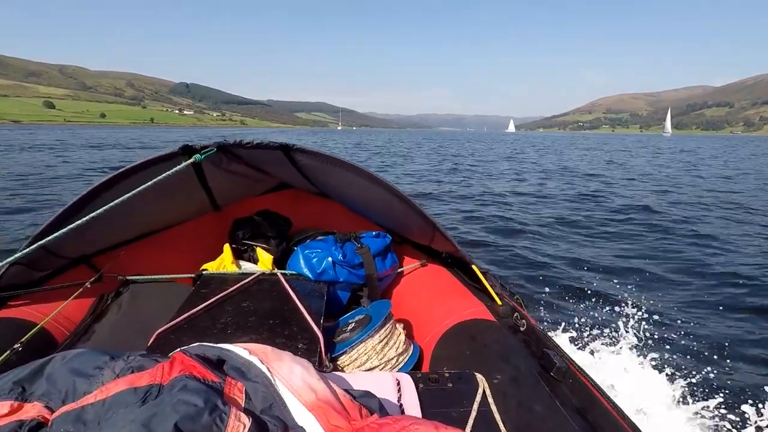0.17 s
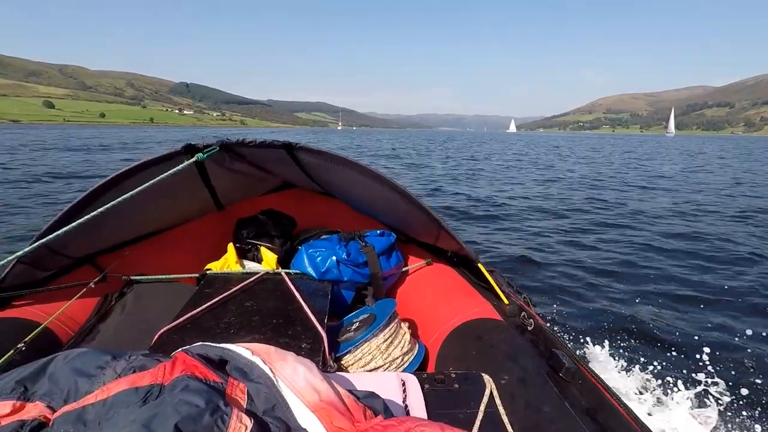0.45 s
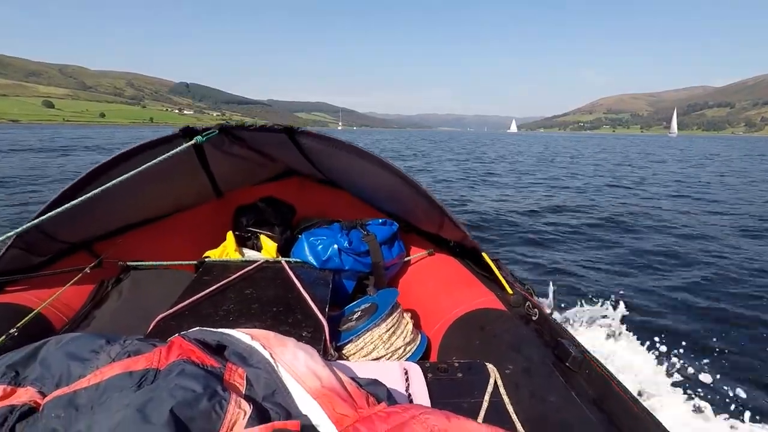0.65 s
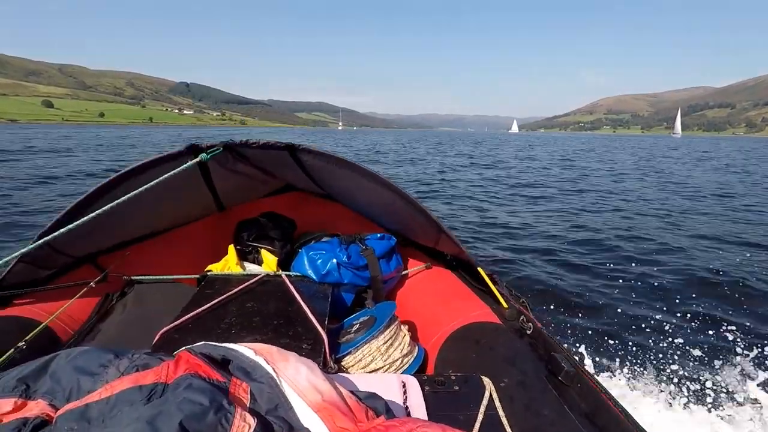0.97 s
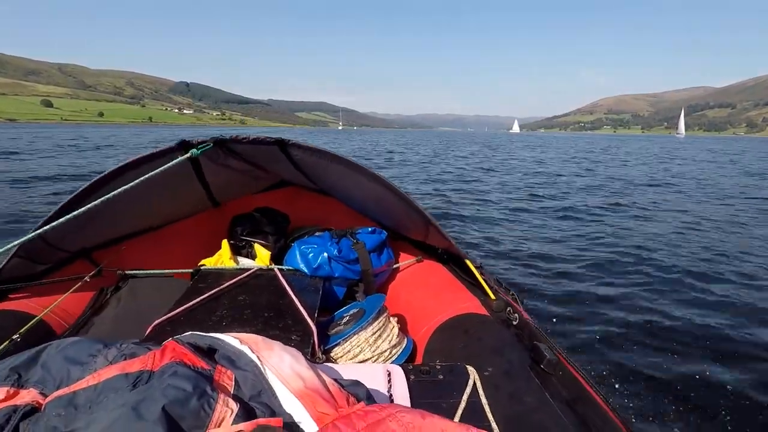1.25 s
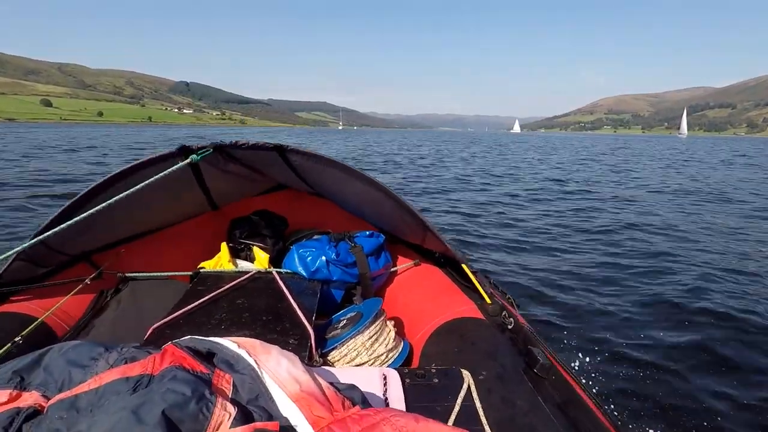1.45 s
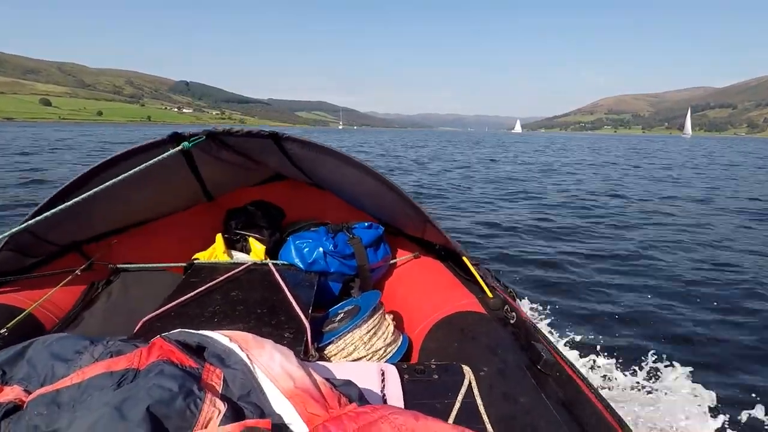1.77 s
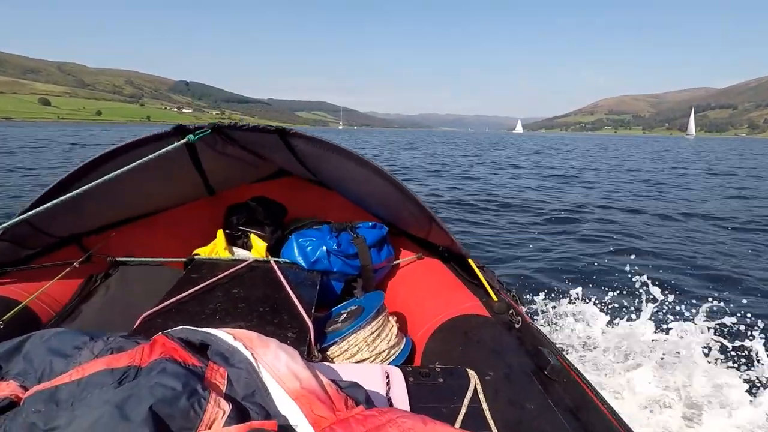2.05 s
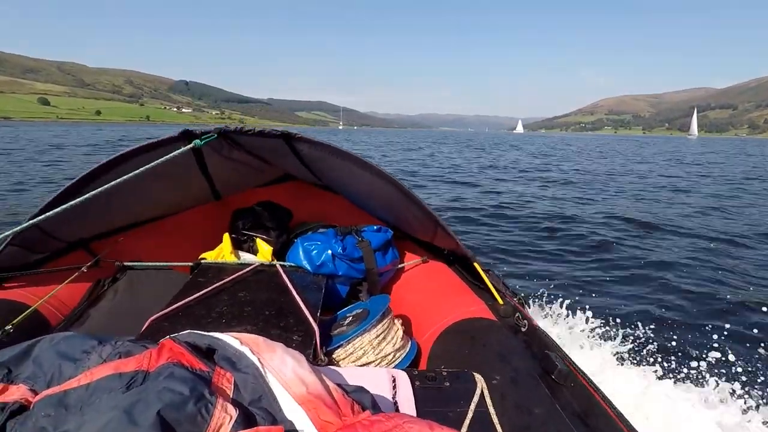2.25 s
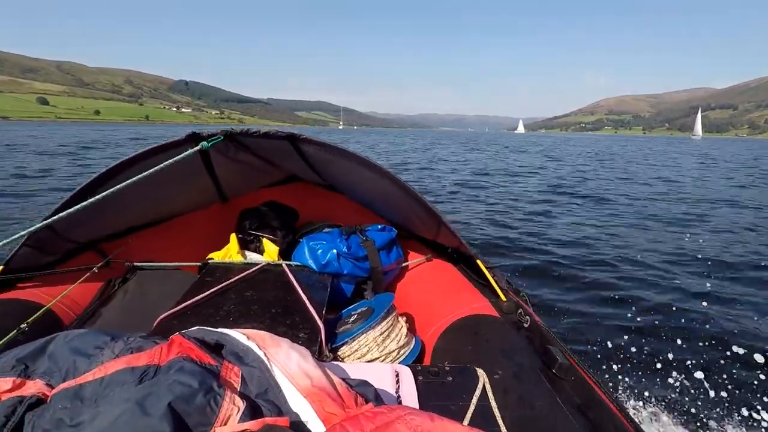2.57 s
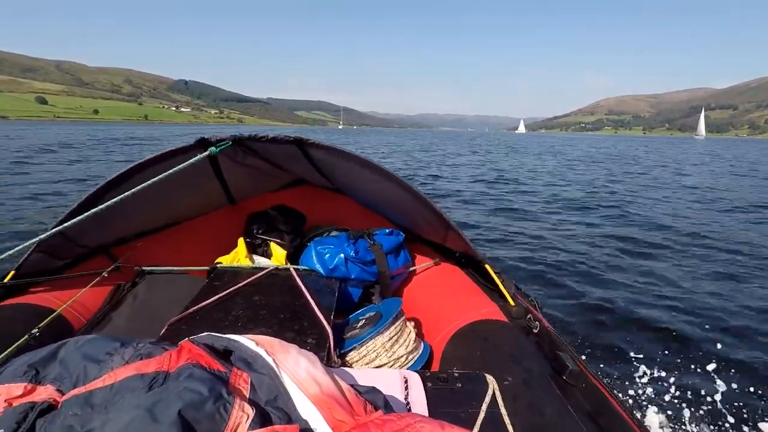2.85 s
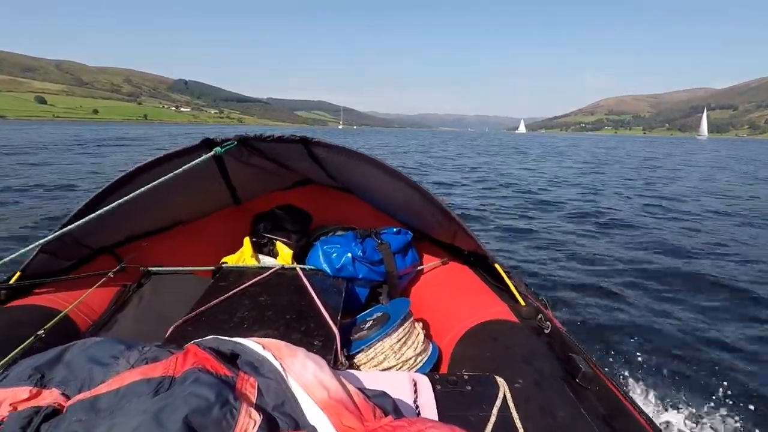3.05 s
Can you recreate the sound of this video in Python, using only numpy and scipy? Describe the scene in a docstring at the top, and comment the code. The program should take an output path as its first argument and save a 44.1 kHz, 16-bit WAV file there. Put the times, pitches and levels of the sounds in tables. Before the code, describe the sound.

Steady low outboard engine hum on an inflatable boat, with gusty wind rumble and splashing spray.

```python
"""A small outboard motor pushes an inflatable boat over open water at a steady throttle.
Sines locked to the shaft make its exhaust drone and gear whine; pulsing noise makes the cowl rattle.
Low noise in quick gusts is the wind on the microphone; droplets and foam hiss make the wash
along the hull and the spray that the bow throws at each wave. A limiter holds the peaks."""
import sys
import numpy as np
from scipy import signal
from scipy.fft import rfft, irfft, next_fast_len
from scipy.io import wavfile
from scipy.ndimage import uniform_filter1d, minimum_filter1d, map_coordinates

SR = 44100
rng = np.random.default_rng(int(sys.argv[2]) if len(sys.argv) > 2 else 0)


def transcribe(signal):
    """Save signal, clipped to [-1, 1], as a 16-bit WAV file at the path in sys.argv[1]."""
    frames = np.atleast_2d(signal).T
    limited = np.clip(frames, -1, 1)
    pcm = np.round(limited * 32767).astype(np.int16)
    wavfile.write(sys.argv[1], SR, pcm)


N = 141120  # samples, 3.2 s
TIME = np.arange(N) / SR  # s


def amp(db):
    """Decibels to gain."""
    return 10 ** (np.asarray(db) / 20)


def unit(x):
    """Scale to rms 1."""
    return x / np.sqrt(np.mean(x ** 2) + 1e-20)


def curve(points):
    """Straight lines through (time [s], value) points."""
    return np.interp(TIME, *np.transpose(points))


def wobble(rate):
    """A smooth random curve around 0, with rate knots a second."""
    return map_coordinates(rng.standard_normal(4096), [TIME * rate + 2], mode="wrap")


def filtered(x, response):
    """Multiply the spectrum of x by a response of frequency [Hz]."""
    padded = next_fast_len(N + SR // 2)
    hz = np.fft.rfftfreq(padded, 1 / SR)
    return irfft(rfft(x, padded) * response(hz), padded)[:N]


def coloured(x, spectrum):
    """Shape x by (frequency [Hz], level [dB]) points on a log axis, at rms 1."""
    points_hz, points_db = np.transpose(spectrum)

    def response(hz):
        return amp(np.interp(np.log(hz + 1), np.log(points_hz + 1), points_db))

    return unit(filtered(x, response))


def hiss(patchy_db):
    """White noise whose gain varies in smooth random patches of time and frequency."""
    spectrogram = signal.stft(rng.standard_normal(N), nperseg=512)[2]
    patches = uniform_filter1d(rng.standard_normal(spectrogram.shape), 8, axis=0)  # across frequency
    patches = uniform_filter1d(patches, 10, axis=1)  # across time
    noise = signal.istft(spectrogram * amp(patchy_db * unit(patches)), nperseg=512)[1]
    return unit(noise[:N])


# spectrum of the wind on the microphone: (frequency [Hz], relative level per Hz [dB])
WIND_SPECTRUM = [(5, -17.5), (15, -10), (32, 0), (70, -1), (110, -3), (165, -8), (240, -15), (320, -18.5),
                 (390, -21), (415, -30), (520, -36.5), (900, -68.5)]
# strength of the headwind: (time [s], relative level [dB])
HEADWIND_GUSTS = [(0.03, -14.5), (0.09, -15.5), (0.78, -19), (0.83, -20.5), (0.87, -16), (1.8, -16.5),
                  (1.9, -22.5), (2.38, -14.5), (2.41, -18.5), (2.69, -13), (2.73, -18), (3.17, -14.5)]
WIND_DB, FLUTTER_DB = 0.5, 2  # level trim; spread of the random flutter


def wind():
    """The headwind tumbles round the microphone: gusts drive its lows, its highs hold steadier."""
    gust_db = curve(HEADWIND_GUSTS)
    air = coloured(rng.standard_normal(N), WIND_SPECTRUM)
    buffet = filtered(air, lambda hz: 1 / (1 + (hz / 260) ** 4))
    gusty = amp(gust_db) * buffet
    steady = amp(gust_db.mean()) * (air - buffet)
    return amp(WIND_DB + FLUTTER_DB * wobble(11)) * (gusty + steady)


DROPS_PER_S, DROP_SPREAD_DB = 3500, 3.5
DROP_SHARE = 0.38  # share of the power in drops; the rest is foam


def droplets(patchy_db):
    """Countless tiny impacts of uneven size over the fizz of foam."""
    hit = rng.random(N) < DROPS_PER_S / SR
    size = amp(DROP_SPREAD_DB * np.minimum(rng.exponential(size=N), 4))
    impacts = unit(hit * size * rng.choice([-1, 1], N))
    return np.sqrt(DROP_SHARE) * impacts + np.sqrt(1 - DROP_SHARE) * hiss(patchy_db)


# spectrum of the water along the hull: (frequency [Hz], relative level per Hz [dB])
WASH_SPECTRUM = [(1000, -25), (1700, -4.5), (2300, -2), (3100, -6), (4000, -2), (5500, -3), (7100, -1),
                 (8700, -4.5), (10200, -14.5), (11300, -22.5), (12400, -18.5), (13600, -25), (15000, -29)]
WASH_DB = -44.5


def hull_wash():
    """Water running along the hull: an even bed of drops and foam with a slight flicker."""
    return amp(WASH_DB + .4 * wobble(90)) * coloured(droplets(patchy_db=1.4), WASH_SPECTRUM)


# the bow meets a wave: (time of the fullest spray [s], level [dB], rise [s], fall [s])
BOW_SPLASHES = [(.16, -44.5, 0.026, 0.031), (.54, -42.5, .07, .07), (.73, -40, .03, .035),
                (.93, -40.5, 0.037, 0.073), (1.12, -38.5, 0.074, 0.054), (1.23, -36.5, 0.056, 0.038),
                (1.6, -53.5, 0.068, 0.042), (1.98, -52, 0.059, 0.11), (2.23, -40.5, .04, 0.044),
                (2.34, -37, 0.072, 0.065), (2.654, -38, 0.054, 0.11), (3.12, -52, .06, 0.067)]
# spectrum of the falling spray: (frequency [Hz], relative level per Hz [dB])
SPRAY_SPECTRUM = [(400, -23), (800, -4), (1100, -5.5), (1400, -4.5), (2200, -0.5), (3200, -4), (5000, -2.5),
                  (6800, 1), (8300, -1.5), (9300, -6.5), (10300, -16.5), (11400, -22), (12400, -13.5),
                  (13600, -21.5), (15000, -24.5)]


def bow_spray():
    """The bow throws a sheet of drops at each wave; its power swells and falls as a lopsided bell."""
    power = np.zeros(N)
    for peak_s, db, rise_s, fall_s in BOW_SPLASHES:
        width_s = np.where(TIME < peak_s, rise_s, fall_s)
        power += amp(db) ** 2 * np.exp(-((TIME - peak_s) / width_s) ** 2 / 2)
    flicker = amp(.5 * wobble(120))
    return np.sqrt(power) * flicker * coloured(droplets(patchy_db=1.6), SPRAY_SPECTRUM)


def partials(angle, orders, flutter_db, smear, rate):
    """Sines locked to the shaft, each fluttering in level [dB] and phase [rad]."""
    total = np.zeros(N)
    for multiple, db in orders:
        level = amp(db + flutter_db * wobble(rate))
        phase = smear * wobble(rate) + rng.uniform(0, 2 * np.pi)
        total += level * np.sin(multiple * angle + phase)
    return np.sqrt(2) * total  # so the levels are rms


# exhaust drone: (multiple of the shaft speed, level before flutter and swell [dB])
EXHAUST_ORDERS = [(1, -22), (2, -11.5), (3, -28), (3.5, -38.5), (4, -34.5), (5, -31.5), (6, -35.5)]


def exhaust_drone(angle):
    """Exhaust pulses repeat with the shaft, so they sum to a drone of low orders."""
    return partials(angle, EXHAUST_ORDERS, flutter_db=.3, smear=0.043, rate=14)


# gears and valve train: (multiple of the shaft speed, level before flutter and swell [dB])
WHINE_ORDERS = [(8, -67), (9, -63.5), (10, -58.5), (11, -61), (12, -56.5), (13.08, -55.5), (14, -58.5),
                (15, -67), (16, -68), (18, -59.5), (20, -57), (21, -58), (22, -63), (24, -63.5),
                (26, -58.5), (30, -69.5), (33, -60)]


def gear_whine(angle):
    """Gears and valve train whine at high orders of the shaft, less steady than the drone."""
    return partials(angle, WHINE_ORDERS, flutter_db=2.0, smear=0.31, rate=16)


# spectrum of the rattling cowl: (frequency [Hz], relative level per Hz [dB])
COWL_SPECTRUM = [(300, -14), (500, -1.5), (780, 3.5), (900, -2), (1020, -7.5), (1140, -15.5), (1260, -3),
                 (1400, -1.5), (1640, -10), (2100, -10.5), (3000, -13.5), (6000, -23), (12000, -49.5)]
COWL_DB = -42.5  # before the swell
TURN_DEPTH, FIRING_DEPTH = 0.28, .22  # beat once and twice a turn, in log power


def cowl_rattle(angle):
    """The shaft shakes the cowl: noise that beats once and twice a turn."""
    log_power = TURN_DEPTH * np.cos(angle) + FIRING_DEPTH * np.cos(2 * angle)
    beat = np.exp(log_power / 2)
    return amp(COWL_DB) * coloured(beat * hiss(patchy_db=1), COWL_SPECTRUM)


# crankshaft speed, nudged by the waves: (time [s], speed [turns/s])
SHAFT_SPEED = [(0, 66.55), (.3, 66.4), (.6, 66.16), (.95, 65.86), (1.3, 66.6), (1.65, 66.75), (1.95, 66.36),
               (2.3, 66.15), (2.75, 66.28), (3.2, 65.95)]
# the motor swells and eases: (time [s], drone level [dB], rattle and whine level [dB])
MOTOR_SWELL = [(0, -0.5, -0.5), (.2, 0, 0), (.4, -1.3, 0), (.65, 1, -0.5), (.85, -0.2, 1), (1.15, 0.9, 0.1),
               (1.32, -.8, 0), (1.47, 0, -0.5), (1.63, -1, 0.7), (1.76, -2, -1), (1.92, 0, -1),
               (2.1, -0.5, -1), (2.3, 0, -0.8), (2.6, 0, 0.5), (2.78, 0.6, -.5), (2.95, 0, -0.3),
               (3.2, -2, -1)]


def outboard():
    """One turning shaft drives the exhaust drone, the gear whine and the cowl rattle."""
    angle = 2 * np.pi * np.cumsum(curve(SHAFT_SPEED)) / SR
    swell_s, drone_db, rattle_db = np.transpose(MOTOR_SWELL)
    drone = amp(np.interp(TIME, swell_s, drone_db)) * exhaust_drone(angle)
    mechanical = gear_whine(angle) + cowl_rattle(angle)
    return drone + amp(np.interp(TIME, swell_s, rattle_db)) * mechanical


def scene():
    """Wind, water and motor at one microphone in the boat."""
    return (wind() + hull_wash() + bow_spray() + outboard())[None]


CEILING_DB, HOLD_S, SMOOTH_S = -3.5, 0.011, 0.0024  # limiter
TOP_HZ = 15250  # band limit


def record(dry):
    """A limiter eases the peaks down, then everything from the band limit up is cut."""
    x = dry[0]
    needed = np.minimum(1, amp(CEILING_DB) / (np.abs(x) + 1e-9))
    held = minimum_filter1d(needed, int(HOLD_S * SR))  # window centred on each sample
    pole = np.exp(-1 / (SMOOTH_S * SR))
    gain = 1 - signal.lfilter([1 - pole], [1, -pole], 1 - held)
    return filtered(x * gain, lambda hz: hz < TOP_HZ)[None]


dry = scene()
out = record(dry)
transcribe(out)
```